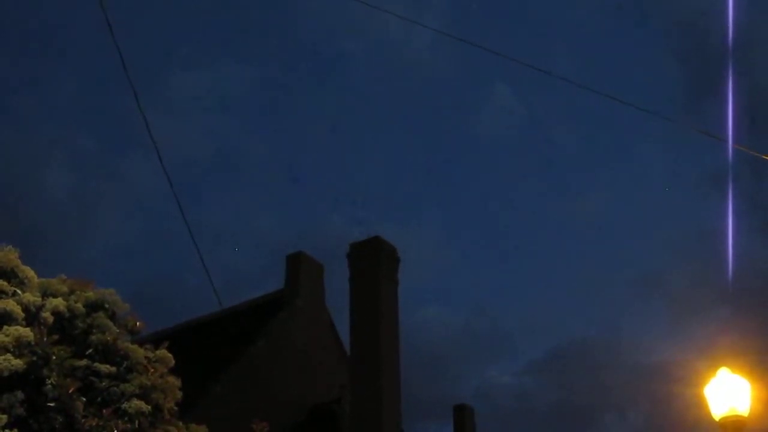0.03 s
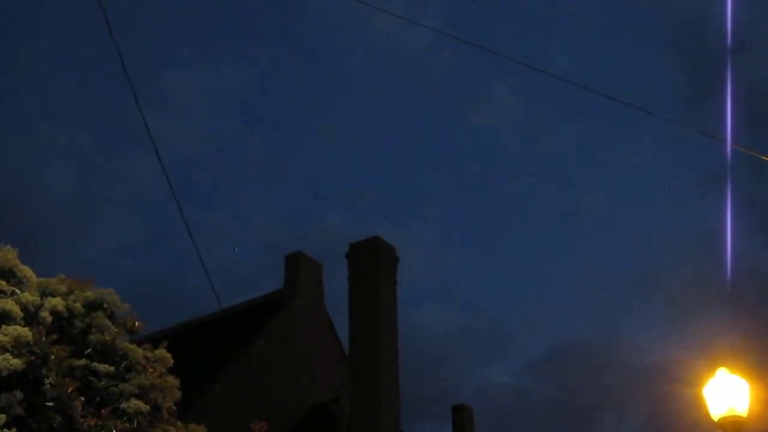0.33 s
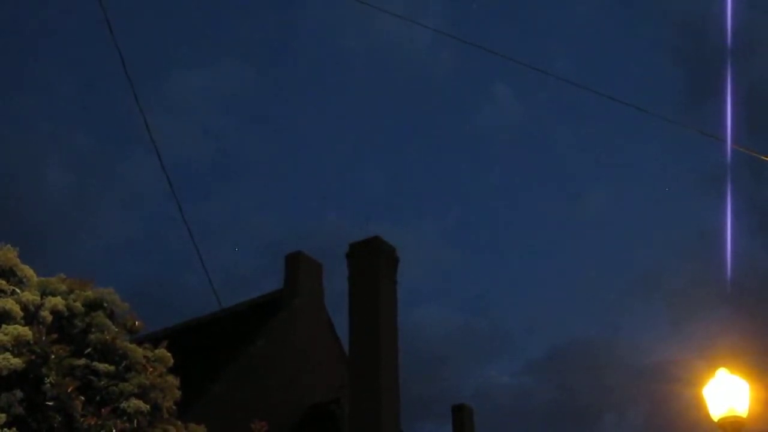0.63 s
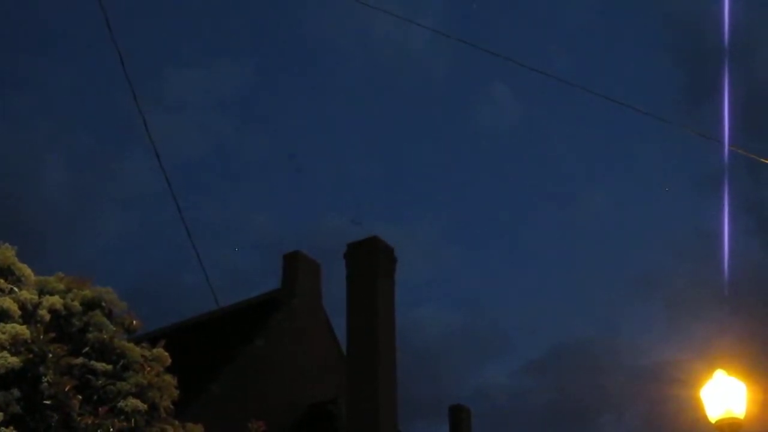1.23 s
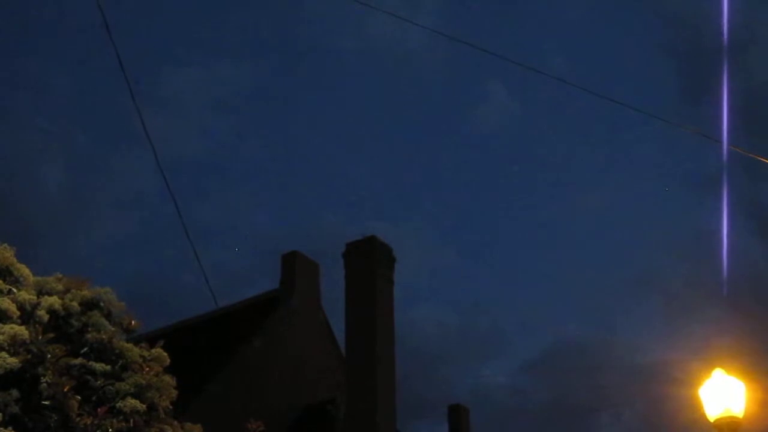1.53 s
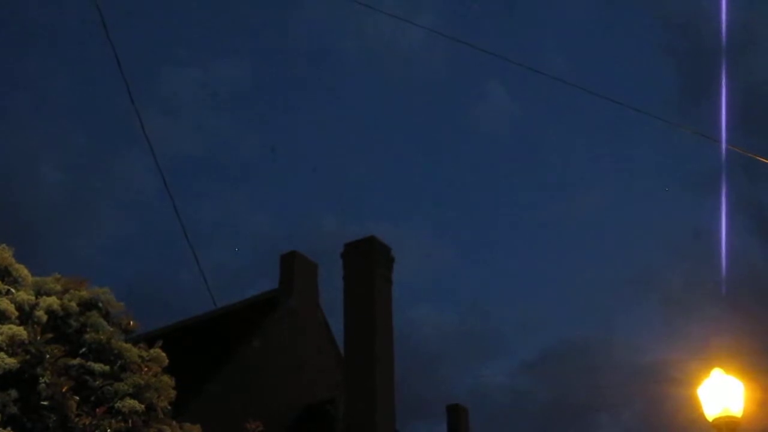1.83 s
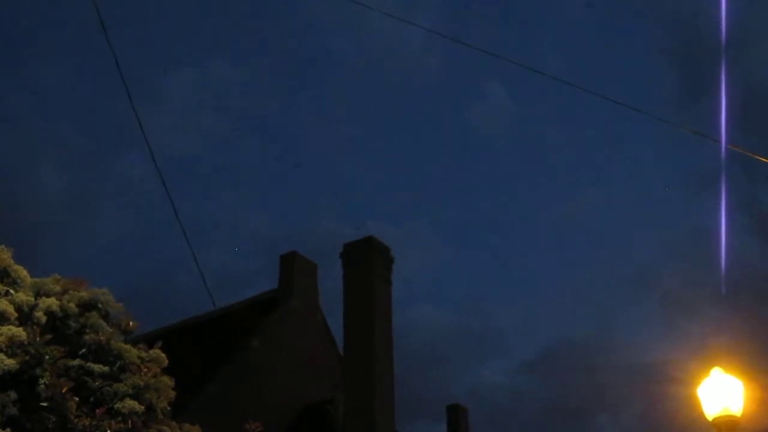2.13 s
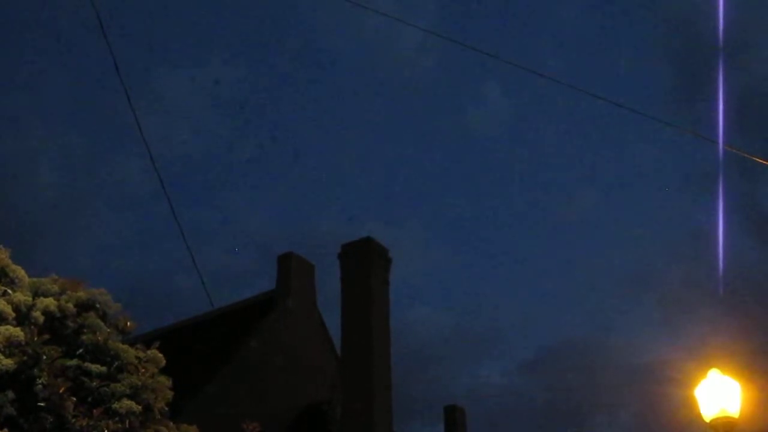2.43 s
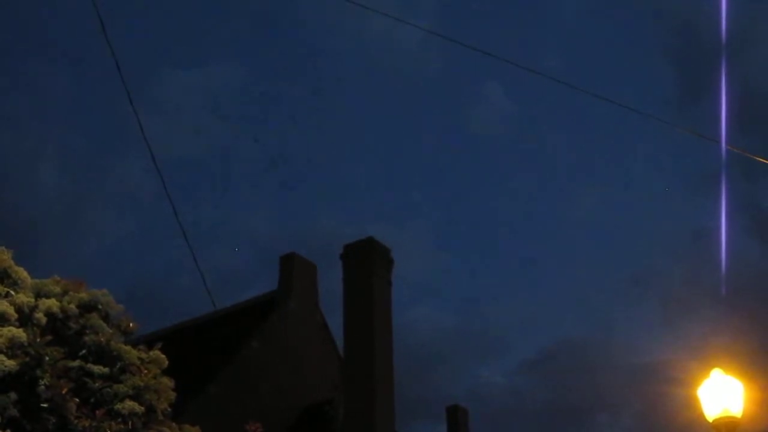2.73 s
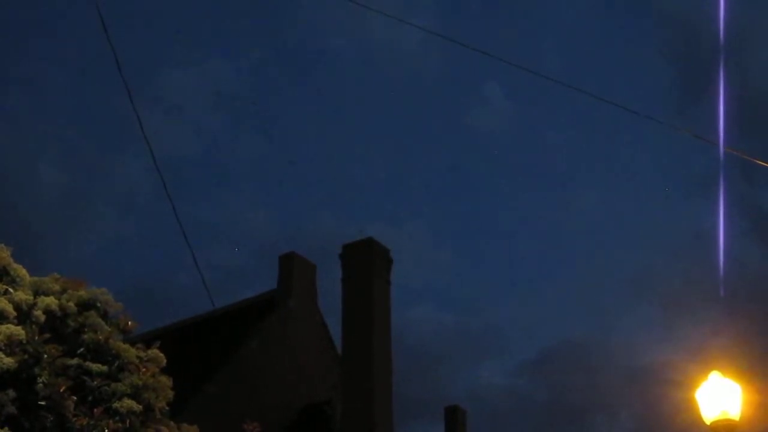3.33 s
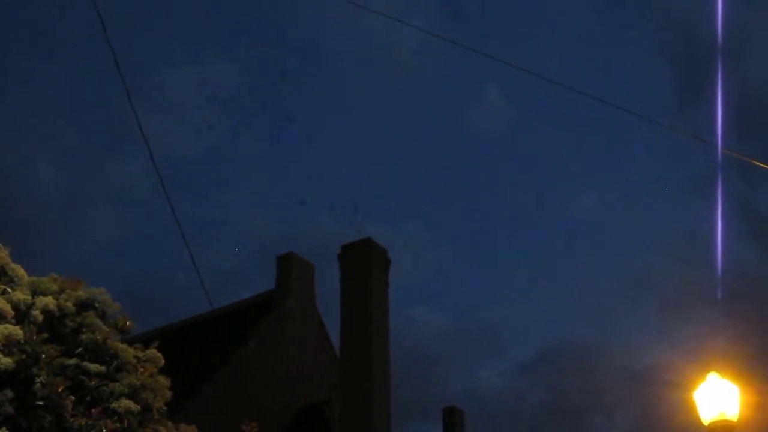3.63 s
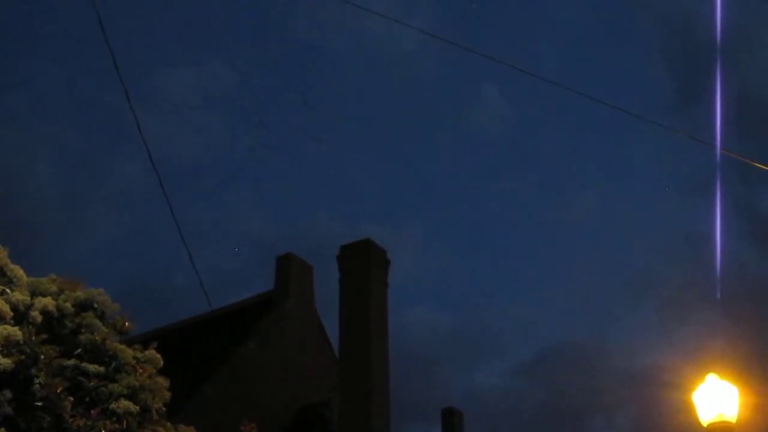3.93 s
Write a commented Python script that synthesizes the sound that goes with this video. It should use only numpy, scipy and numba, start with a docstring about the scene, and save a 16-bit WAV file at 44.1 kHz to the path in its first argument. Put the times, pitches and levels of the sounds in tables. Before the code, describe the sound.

Swifts wheel over rooftops, giving rapid, high, falling chirps that echo faintly from the houses. Beneath them distant town traffic rumbles steadily, and a low engine drone grows louder toward the end.

```python
"""Chimney swifts wheel over a roof at dusk. Each chip is a near-pure whistle whose frequency sweeps
down within a few hundredths of a second and echoes faintly from the houses. Shallower calls, a
far flock and one small tick sound among the chips. Below, a distant engine drones at harmonics
of its firing rate through the noise of town traffic. The microphone is deaf in a band near 8 kHz."""
import sys
import numpy as np
from scipy import signal
from scipy.fft import rfft, irfft
from scipy.io import wavfile
from scipy.ndimage import uniform_filter1d
from numba import njit

SR = 44100
rng = np.random.default_rng(int(sys.argv[2]) if len(sys.argv) > 2 else 0)


def dump(signal):
    """Clip the signal to [-1, 1] and save it as 16-bit WAV at the path in sys.argv[1]."""
    limited = np.clip(np.atleast_2d(signal).T, -1, 1)
    pcm = np.round(limited * 32767).astype(np.int16)
    wavfile.write(sys.argv[1], SR, pcm)


N = 176400


def undb(db):
    """Amplitude ratio of a level in decibels."""
    return 10 ** (np.asarray(db) / 20)


def unit(x):
    """Normalisation to an rms of 1."""
    return x / np.sqrt(np.mean(x ** 2))


def curve(table, axis=1):
    """Linear interpolation of one column of a timed table at every sample."""
    rows = np.array(table)
    return np.interp(np.arange(N) / SR, rows[:, 0], rows[:, axis])


def walk(rate_hz, size=N):
    """Smoothed random steps: a wander with a standard deviation near 1."""
    hold = max(int(SR / rate_hz), 2)
    steps = np.repeat(rng.standard_normal(size // hold + 1), hold)
    return 1.2 * uniform_filter1d(steps, hold)[:size]


def add(out, start_s, sound):
    """Superposition of a sound on the mix from a given time."""
    i = int(np.clip(start_s * SR, 0, N - 1))
    out[i:i + len(sound)] += sound[:N - i]


@njit
def bandpass(x, centre_hz, width):
    """Second-order resonance with a moving centre; width is bandwidth over centre frequency (1/Q)."""
    y, band_state, low_state = np.empty(len(x)), 0., 0.
    for i in range(len(x)):
        g = np.tan(np.pi * centre_hz[i] / SR)
        band = (band_state + g * (x[i] - low_state)) / (1 + g * (g + width))
        band_state = 2 * band - band_state
        low_state += 2 * g * band
        y[i] = width * band
    return y


def traffic():
    """Broadband noise of tyres and air: its octave bands swell together and flicker independently."""
    # spectral density of the wash: frequency_hz, relative_db
    density = [(20, -7), (70, 4), (270, 1.5), (400, -3), (600, -5), (1300, -13), (2100, -18), (3100, -27),
               (5500, -32), (7000, -43), (11500, -43.5), (15500, -49)]
    # overall level of the wash: time_s, level_db
    level = [(0, -39), (4, -37.5)]
    octave = np.log2(np.maximum(np.fft.rfftfreq(N, 1 / SR), 1))
    hz, db = np.array(density).T
    spectrum = rfft(rng.standard_normal(N)) * undb(np.interp(octave, np.log2(hz), db))
    out, swell_db = np.zeros(N), 1.1 * walk(1.7)
    for centre in range(4, 16):  # octaves from 16 Hz up
        band = irfft(spectrum * np.clip(1 - abs(octave - centre), 0, 1), N)
        flicker_db = .92 * walk(9)
        out += band * undb(swell_db + flicker_db)
    return unit(out) * undb(curve(level))


def tyres():
    """Band-limited noise whose centre and level drift as distant cars come and go."""
    # tyre roar: time_s, centre_hz, level_db
    roar = [(.3, 840, -51), (.7, 700, -43), (1.08, 922, -46), (1.8, 765, -47), (2.6, 625, -44),
            (3.05, 802, -45), (3.4, 814, -48), (4, 826, -49)]
    centre_hz, width = curve(roar), .62
    band = bandpass(rng.standard_normal(N), centre_hz, width)
    return unit(bandpass(band, centre_hz, width)) * undb(curve(roar, axis=2))


def engine():
    """Periodic firings make a harmonic series, of which only the low orders carry this far."""
    # firing rate: time_s, rate_hz
    firing = [(0, 37.26), (2.6, 37.91), (3.3, 38.3), (4, 38.95)]
    # second harmonic: time_s, level_db
    second = [(0, -35.5), (.55, -35.5), (1.05, -41), (1.5, -33.5), (2.9, -24.5), (3.17, -30), (3.7, -21.5)]
    # third harmonic: time_s, level_db
    third = [(0, -28), (.5, -25), (1.201, -22), (2.199, -26), (2.901, -29.5), (3.4, -21.5), (3.73, -19.5),
             (3.84, -30), (3.96, -19)]
    # fifth harmonic: time_s, level_db
    fifth = [(0, -39), (1.05, -46), (1.5, -36.5), (2.48, -34), (2.62, -46), (4, -44.5)]
    # each crank harmonic that uneven cylinders leave between the firing harmonics: time_s, level_db
    uneven = [(0, -62), (4, -51.5)]
    firings_per_turn, throb_depth, wander_db = 3, .11, 3.5
    phase = 2 * np.pi * np.cumsum(curve(firing)) / SR
    partial = lambda order: np.sqrt(2) * np.sin(order * phase + rng.uniform(0, 2 * np.pi))
    wander = lambda: undb(wander_db * walk(2))
    out = undb(curve(second)) * partial(2) + undb(curve(third)) * partial(3)
    out += undb(curve(fifth)) * (partial(5) + undb(-10) * partial(7))
    out += undb(-44) * wander() * partial(4)
    for crank_order in range(7, 24):
        if crank_order % firings_per_turn:
            out += undb(curve(uneven)) * wander() * partial(crank_order / firings_per_turn)
    # uneven cylinders also modulate the amplitude once per turn of the crank
    return out * (1 + throb_depth * np.sin(phase / firings_per_turn))


def houses(x):
    """Reverberation: quick scatter from the roofs and a longer, fainter tail from the street."""
    roofs, street, onset_s = (-11, .08), (-15.5, .7), .0036  # pairs: gain_db, t60_s
    t = np.arange(SR) / SR
    response = np.zeros(SR)
    for gain_db, t60_s in (roofs, street):
        envelope = np.exp(-np.log(1000) * t / t60_s) * np.clip(t / onset_s, 0, 1)
        tail = rng.standard_normal(SR) * envelope
        response += undb(gain_db) * tail / np.linalg.norm(tail)
    return x + signal.fftconvolve(x, response)[:N]


def tick():
    """One small transient: a burst of band-limited noise with an exponential decay."""
    start_s, level_db, decay_s, centre_hz = 2.029, -42, .004, 5600.
    out, t = np.zeros(N), np.arange(SR // 20) / SR
    burst = unit(bandpass(rng.standard_normal(len(t)), np.full(len(t), centre_hz), width=.43))
    add(out, start_s, undb(level_db) * burst * np.exp(-t / decay_s))
    return out


def whistle(length_s, first_hz, last_hz, fade_db):
    """A swift's call is a frequency-modulated tone: it lingers on its first pitch, glides and fades."""
    linger_s, attack_s, release_share = .0018, .0015, .17
    waver_depth, accent_db, accent_s = .017, 5, .0034
    t = np.arange(int(length_s * SR)) / SR
    glide = np.hypot(t, linger_s) - linger_s
    progress = glide / glide[-1]
    waver, flicker = (walk(rate_hz, size=4096)[:len(t)] for rate_hz in (868, 250))
    hz = (first_hz + (last_hz - first_hz) * progress) * (1 + waver_depth * waver)
    phase = 2 * np.pi * np.cumsum(hz) / SR
    fundamental = undb(-fade_db * progress) * np.sin(phase)
    # the overtones are 13 dB per octave stronger in low calls; they flicker and fade
    overtone_db = -26 + 13 * np.log2(5600 / first_hz) + 2.5 * flicker - 6 * progress
    accent = undb(accent_db * np.exp(-(t / accent_s) ** 2))  # a bright onset
    overtones = accent * np.sin(2 * phase) + undb(-12.5) * np.sin(3 * phase)
    edges = np.clip(t / attack_s, 0, 1) * np.clip((1 - progress) / release_share, 0, 1)
    return np.sin(edges * np.pi / 2) ** 2 * (fundamental + undb(overtone_db) * overtones)


def far_swifts():
    """Random calls, from level notes to steep chips, sum incoherently and swell as the flock nears."""
    # mean level of a distant call: time_s, level_db
    level = [(0, -65.5), (1.42, -66), (1.55, -52.5), (2.1, -53.5), (2.35, -63)]
    calls_per_s, scatter_db, lowest_hz, range_hz = 83, 4, 4540, 2237
    out = np.zeros(N)
    for when, length, pitch, fall, strength in rng.random((int(calls_per_s * N / SR), 5)):
        first_hz = lowest_hz + range_hz * pitch
        call = whistle(.008 * (1 + 2 * length), first_hz, first_hz * (1 - fall / 2), fade_db=8.5)
        add(out, when * N / SR, undb(scatter_db * (2 * strength - 1)) * call)
    return out * undb(curve(level))


def near_swifts():
    """Direct sound plus one wall reflection, whose delay varies with where the bird is."""
    # steep chips that sweep down to chip_end_hz: start_s, length_s, first_hz, level_db
    chips = [(0, 0.014, 5470, -28), (.095, 0.021, 6600, -29), (.173, .025, 6670, -32),
             (0.301, .032, 6220, -34), (.5924, .012, 4600, -41), (.682, 0.0082, 5500, -37.5),
             (.734, 0.014, 6170, -32.5), (0.796, 0.021, 6560, -30), (.886, 0.021, 6060, -31),
             (0.96, 0.015, 5730, -33), (1.007, .008, 5080, -37.5), (1.054, 0.017, 6370, -30.5),
             (1.145, 0.023, 6030, -30.5), (1.241, 0.017, 4850, -38), (1.332, 0.011, 5940, -34),
             (1.395, 0.015, 6310, -32), (1.452, 0.016, 6200, -40), (1.483, 0.02, 6830, -41),
             (1.499, .03, 7100, -38.5), (1.513, .024, 5890, -34), (1.536, .025, 7300, -44),
             (1.542, .02, 6700, -37.5), (1.552, 0.016, 7100, -36.5), (1.588, 0.023, 7360, -41),
             (1.615, 0.018, 6900, -38), (1.618, 0.023, 4620, -44), (1.649, 0.024, 7200, -46),
             (1.708, 0.017, 5830, -39), (1.712, 0.014, 5950, -34), (1.777, 0.019, 6250, -35.5),
             (1.908, 0.019, 5690, -34), (1.91, 0.021, 6950, -35.5), (1.938, 0.022, 7240, -43),
             (1.97, 0.03, 5870, -43), (1.992, 0.026, 6500, -43.5), (2.021, 0.03, 6100, -44),
             (2.188, .028, 6100, -43), (2.527, 0.017, 5700, -40), (2.541, 0.017, 5120, -44.5),
             (2.572, .035, 5900, -51.5), (2.749, 0.016, 5930, -35.5), (2.833, 0.012, 6200, -41.5),
             (2.895, 0.018, 6600, -36), (2.965, 0.018, 6520, -35.5), (3.03, 0.016, 5920, -38.5),
             (3.094, 0.017, 6450, -41.5), (3.148, .015, 5560, -45.5), (3.181, 0.037, 6420, -43),
             (3.263, 0.015, 5200, -38.5), (3.316, 0.0099, 5380, -42), (3.346, .012, 5200, -41.5),
             (3.374, .021, 6300, -33.5), (3.486, 0.025, 6400, -39.5), (3.546, .015, 5680, -47),
             (3.592, 0.016, 5330, -36.5), (3.615, .018, 6250, -43), (3.654, 0.016, 5200, -43.5),
             (3.699, .01, 5800, -41), (3.708, 0.015, 5640, -39.5), (3.764, 0.018, 6260, -36),
             (3.808, 0.012, 5900, -41.5), (3.879, 0.015, 6070, -40.5), (3.888, 0.028, 5900, -39)]
    # shallower calls between the chips: start_s, length_s, first_hz, last_hz, relative_db
    pips = [(0.054, 0.015, 6200, 6300, -30), (0.098, 0.023, 6560, 4400, -30.5),
            (0.186, 0.02, 5790, 4660, -29), (0.247, 0.026, 6020, 5500, -31), (0.265, 0.02, 5150, 3500, -38),
            (0.874, 0.0039, 6060, 6440, -32), (1.1188, 0.0097, 5750, 6120, -30.5),
            (1.232, 0.012, 5310, 5500, -35.5), (1.476, 0.011, 5250, 4670, -34.5),
            (1.4913, 0.0078, 6100, 5690, -38), (1.704, 0.014, 5240, 4450, -40),
            (1.784, 0.013, 5030, 4160, -38.5), (1.823, 0.014, 4880, 4100, -38),
            (1.864, 0.017, 5300, 4130, -37), (1.956, 0.035, 4580, 3320, -43.5),
            (2.0615, 0.029, 4920, 3200, -40), (2.083, 0.017, 5020, 4830, -41),
            (2.104, 0.014, 5100, 4820, -42), (2.122, 0.023, 4050, 3350, -46),
            (2.268, 0.0323, 5000, 3700, -43), (2.298, 0.022, 4950, 4400, -44),
            (2.48, 0.0118, 5080, 4830, -48), (2.631, 0.011, 4600, 4720, -46),
            (2.672, 0.01, 4750, 4850, -48), (2.8595, 0.028, 6030, 4150, -42.5),
            (2.953, 0.0157, 4830, 4500, -41.5), (3.221, 0.031, 5900, 4140, -41.5),
            (3.455, 0.0073, 5870, 6600, -41.5), (3.85, 0.01, 5500, 5180, -41),
            (3.961, 0.0118, 5400, 4790, -41)]
    chip_end_hz, pip_gain_db = 3058, -2
    wall_delay_s, wall_db = .007, -20
    calls = [(start_s, undb(db) * whistle(length_s, first_hz, chip_end_hz, fade_db=19))
             for start_s, length_s, first_hz, db in chips]
    calls += [(start_s, undb(db + pip_gain_db) * whistle(length_s, first_hz, last_hz, fade_db=8.5))
              for start_s, length_s, first_hz, last_hz, db in pips]
    out = np.zeros(N)
    for start_s, call in calls:
        add(out, start_s, call)
        add(out, start_s + rng.uniform(.5, 1.5) * wall_delay_s, undb(wall_db) * call)
    return out


def scene():
    """Superposition in one channel: traffic and engine, with birds and tick echoing among the houses."""
    town = traffic() + tyres() + engine()
    return (town + houses(tick() + near_swifts() + far_swifts()))[None, :]


def record(dry):
    """Frequency response: the microphone's notch, in two equal stages, and the recorder's upper limit."""
    notch_hz, stage_width_hz, cutoff_hz = 7900, 990, 15900
    notch = signal.iirnotch(notch_hz, notch_hz / stage_width_hz, fs=SR)
    notched = signal.lfilter(*notch, signal.lfilter(*notch, dry))
    return signal.sosfilt(signal.ellip(8, .2, 70, cutoff_hz, fs=SR, output="sos"), notched)


dry = scene()
out = record(dry)
dump(out)
```